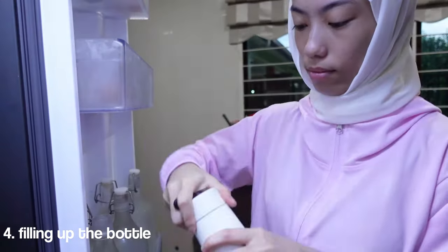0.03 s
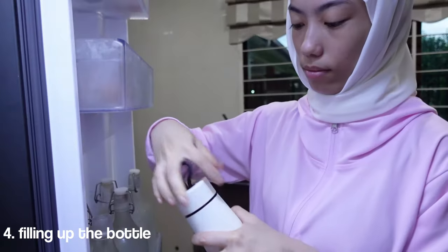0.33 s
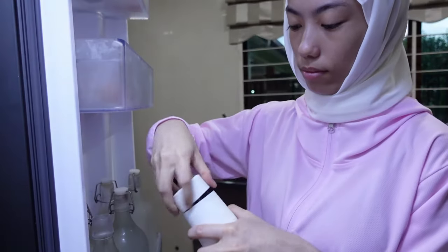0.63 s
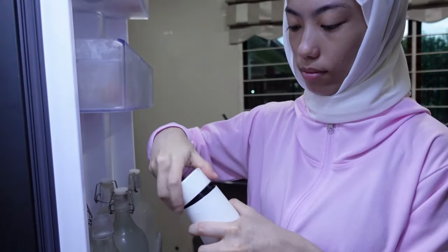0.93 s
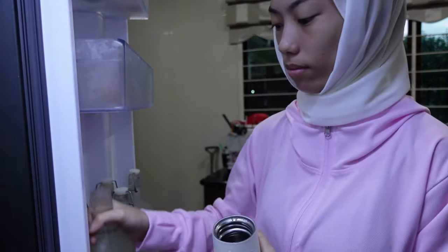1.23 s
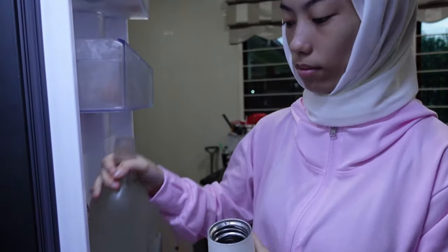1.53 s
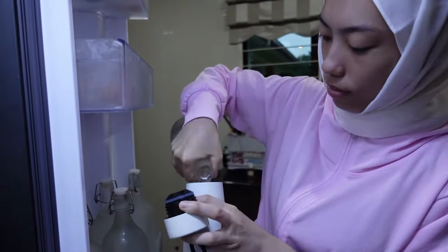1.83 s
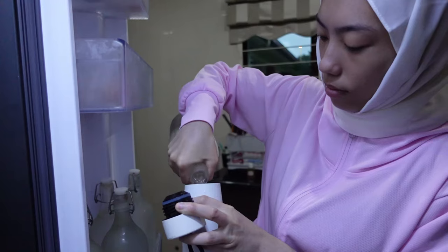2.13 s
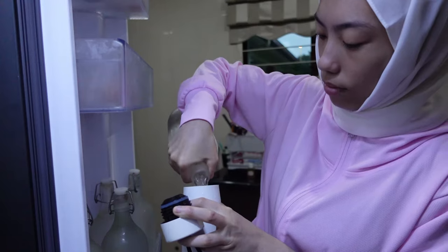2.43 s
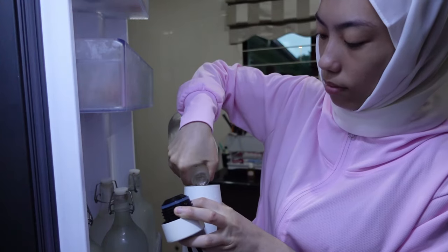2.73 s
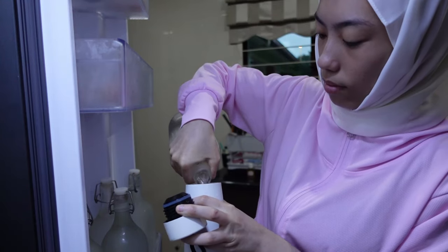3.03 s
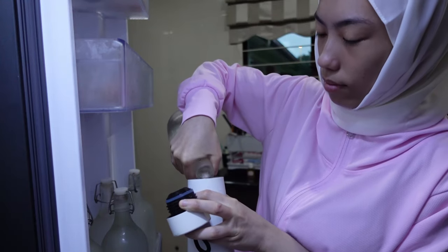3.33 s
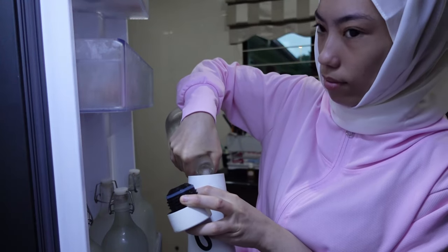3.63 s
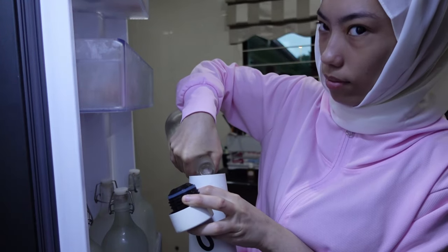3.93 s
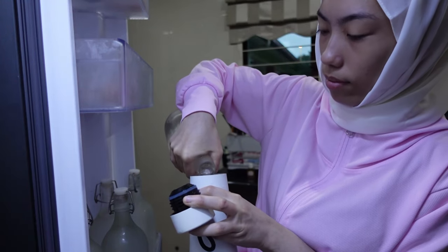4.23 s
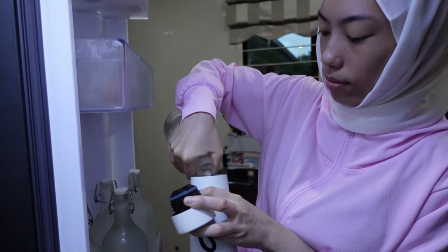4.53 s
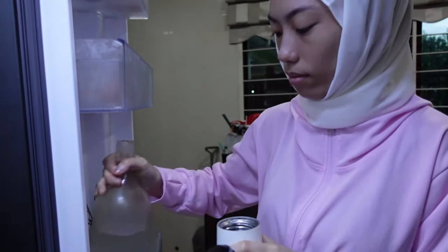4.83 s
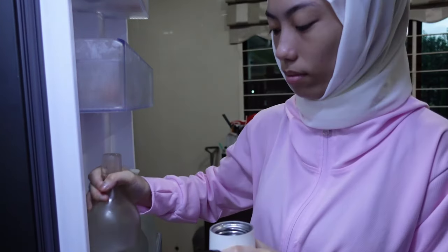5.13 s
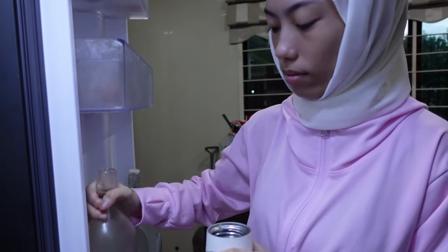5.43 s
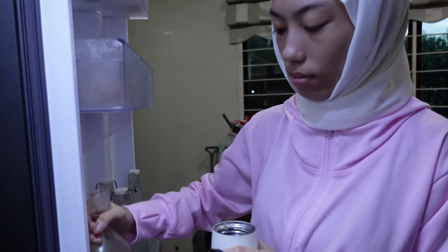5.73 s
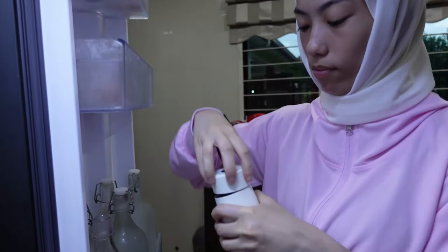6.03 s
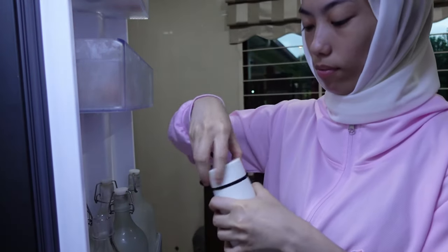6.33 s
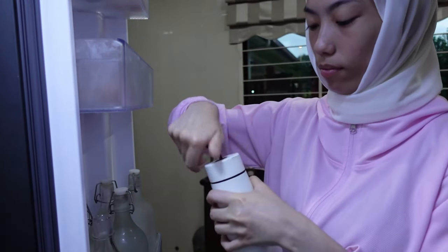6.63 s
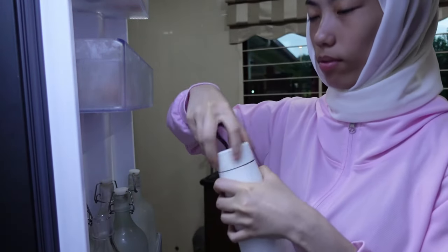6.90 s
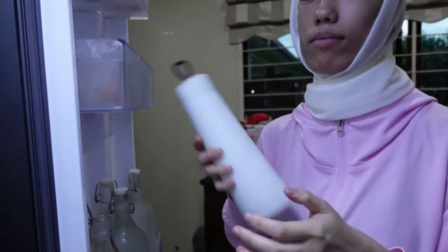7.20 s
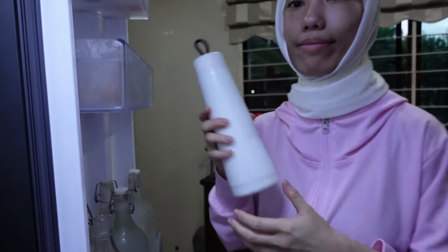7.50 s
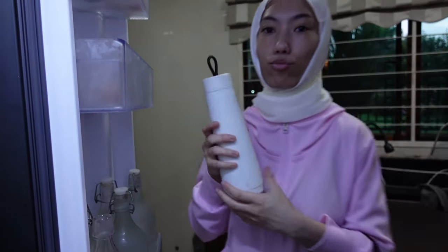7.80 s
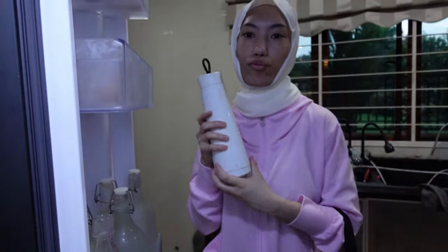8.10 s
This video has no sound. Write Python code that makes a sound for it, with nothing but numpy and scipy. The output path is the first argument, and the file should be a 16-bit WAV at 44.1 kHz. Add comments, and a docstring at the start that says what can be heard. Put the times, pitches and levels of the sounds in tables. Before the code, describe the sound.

Water pours from a glass bottle into a steel flask in a kitchen, between cap squeaks, clicks and glass knocks.

```python
"""In a kitchen, a steel flask's cap squeaks on its seal and rattles off along the threads.
Next, a glass bottle is dragged from a fridge door shelf. Water drums on the flask's bottom, then
splashes as it fills, while trapped bubbles ping and the bottle glugs as it gulps air.
The bottle clinks back among its neighbours and the cap is screwed on. Last, the full flask
sloshes faintly. Soft room noise lies under it all, and sleeves rustle now and then."""
import sys
import numpy as np
from scipy import signal
from scipy.io import wavfile
from scipy.ndimage import uniform_filter1d

SR = 44100
rng = np.random.default_rng(int(sys.argv[2]) if len(sys.argv) > 2 else 0)


def digitize_waveform(pressure):
    """Quantize a signal to 16-bit integers and store it at the path in sys.argv[1].

    Rows of a 2-D input are taken as channels; values are limited to [-1, 1].
    """
    field = np.atleast_2d(pressure).T
    bounded = np.clip(field, -1, 1)
    quanta = np.round(bounded * 32767).astype(np.int16)
    wavfile.write(sys.argv[1], SR, quanta)


N = 368631
TIME = np.arange(N) / SR

# the notes of the struck steel flask: pitch_hz, level_db, ring_s (time to fade by 60 dB)
FLASK_NOTES = [(815, -28, .15), (1031, -6, 0.55), (1080, -13, 0.72), (1530, -12, 0.73), (1760, -21.5, 0.78),
               (2060, -6.5, 0.15), (2440, -7, 0.12), (2745, -28, 0.21), (3050, -7, 0.16), (3180, 0, 0.14),
               (3820, -22, 0.36), (4800, -13, 0.12), (4970, -21, 0.16), (6120, -16, 0.28),
               (6400, -23, 0.24), (7100, -13, 0.22)]
# the tone of a thin hiss: pitch_hz, level_db
HISS_TONE = [(400, -20), (1400, 1.5), (2600, 10.5), (3600, 3), (6000, 0.5), (10000, -7.5), (16000, -41)]


def filling():
    """Water splashes, pings and glugs into the flask, under a shrinking column of air."""
    # water leaves the bottle in gushes: start_s, length_s, bubbles_db, splash_db, churn_db
    gushes = [(2.21, 0.042, -13, -32, -35), (2.435, 0.036, -9, -17, -44), (2.61, 0.02, -16, -20, -47),
              (2.645, 0.028, -4, -16.5, -54), (2.745, 0.062, -14.5, -37, -61),
              (2.82, 0.1, -14.5, -24.5, -61), (3.055, .03, -14, -18, -39), (3.085, 0.33, -12, -16.5, -26),
              (3.45, 0.042, -10.5, -16, -20.5), (3.55, 0.15, -22, -30, -33),
              (3.695, 0.027, -9.5, -30, -27.5), (3.815, 0.058, -20, -27, -43),
              (3.91, 0.049, -11.5, -34, -34.5), (4.11, 0.048, -12, -23.5, -29),
              (4.3, 0.063, -22, -28.5, -66), (4.36, 0.12, -34, -26, -43), (4.536, 0.075, -13, -46, -33),
              (4.68, 0.02, -20, -39, -40)]
    # the air bubbles that stand out: start_s, pitch_hz, level_db
    loud_bubbles = [(2.237, 1276, -5.5), (2.261, 2560, -5), (2.2696, 5270, 10.5), (2.2827, 5850, -1.5),
                    (2.3158, 4670, 0), (2.3695, 1284, 7.5), (2.389, 1300, 3), (2.4074, 1412, -2.5),
                    (2.421, 1460, -3.5), (2.4362, 1290, 2), (2.6557, 2980, -0.5), (2.6743, 1370, -17),
                    (2.6937, 1300, -6), (2.715, 5520, -3.5), (2.748, 1277, -7.5), (2.8568, 4580, -6),
                    (2.8788, 4970, -6), (2.9088, 5250, 1), (2.912, 1284, -3), (2.9276, 5600, -0.5),
                    (2.9563, 1290, -5.5), (3.0029, 6000, 1.5), (3.1123, 1370, 0.5), (3.3044, 1411, 4.5),
                    (3.5464, 5080, -1), (3.642, 5350, -4), (3.7322, 5230, -5), (3.911, 1440, -9.5),
                    (3.9834, 4990, -4.5), (4.052, 5600, -8), (4.0598, 5170, 1), (4.121, 5240, 2),
                    (4.156, 1340, -3), (4.362, 5700, 2), (4.439, 5230, 3), (4.5424, 4800, -7),
                    (4.6006, 5800, -7), (4.611, 5640, -0.5)]
    # random bubbles in a gush, large to small: pitch_hz, spread_octaves, count_per_s, level_db
    gush_bubbles = [(1380, 0.066, 37, -3), (2313, 0.357, 65, -3.5), (5034, 0.175, 60, 0)]
    # the low tone of churning water: pitch_hz, level_db
    churn_tone = [(50, -58), (150, -25), (280, -1), (370, -0.5), (490, 7.5), (720, 0), (1000, 1.5),
                  (1600, -31), (4000, -38)]
    bubble_gain, gush_gain, churn_gain = swells(gushes, rise_s=0.0047, fall_db_per_s=241)
    all_bubbles = loud_bubbles + trapped_bubbles(bubble_gain, gush_bubbles, spread_db=2.5)
    pings = bubble_pings(all_bubbles, rise=0.061, swell_cycles=1.96)
    # keeps the pings light and bright, with no low knock
    pings = signal.sosfilt(signal.butter(4, 850, "high", fs=SR, output="sos"), pings)
    splash, spray = splashing(gush_gain, slaps(all_bubbles))
    churn = amp(-0.3) * churn_gain * noise(churn_tone) * amp(3.5 * wander(35))
    # the steel walls bounce each ping about
    echoes = reverb(pings, [(1300, 0.041), (5000, 0.026)], delay_s=0.001577)
    # the air's note climbs as the water rises
    air_hz = np.interp(TIME, [2.3, 3.3, 4.7], [1290, 1370, 1580])
    air_column = amp(5) * resonate(splash, air_hz, width_hz=87)
    wall = amp(18) * resonate(splash + churn, 1026, width_hz=11)
    return amp(-2) * (pings + echoes) + splash + spray + churn + air_column + wall + glugging()


def splashing(gush_gain, slap_gain):
    """Falling water whips up a froth of tiny bubbles and throws a fine, bright spray."""
    # a thin stream runs on between gushes: start_s, length_s, splash_db, spray_db
    trickle = [(2.26, 1.965, -34, -35.5), (4.31, 0.412, -42, -29.5)]
    # the tone of the splash: pitch_hz, level_db
    splash_tone = [(200, -63), (800, -26), (1300, -2.5), (1900, -4.5), (2800, -1.5), (3700, -6.5),
                   (5100, -1.5), (7000, -21), (16000, -41)]
    # the tone of the spray: pitch_hz, level_db
    spray_tone = [(500, -59), (3500, -43), (5300, 2), (7200, -2), (9000, 1), (12000, -5), (16000, -11.5)]
    trickle_gain, mist_gain = swells(trickle, rise_s=0.0085, fall_db_per_s=240)
    froth = fizz(2200, ring_cycles=111) + 0.61 * patter(4400, spread_db=-6.5)
    splash_gain = amp(-4) * np.hypot(gush_gain, trickle_gain) * amp(2.8 * wander(45))
    splash = (splash_gain + amp(-8) * slap_gain) * unit(colour(froth, splash_tone))
    drops = fizz(800, ring_cycles=133) + 1.3 * patter(1500, spread_db=0.5)
    spray_gain = amp(-3.5) * np.hypot(amp(-9) * gush_gain, mist_gain) * amp(3 * wander(45))
    spray = (spray_gain + amp(-11.5) * slap_gain) * unit(colour(drops, spray_tone))
    return splash, spray


def glugging():
    """The bottle gulps air, and each gulp drops a slug of water that rings the flask's wall."""
    # air gulped back into the bottle: start_s, pitch_hz, level_db
    glugs = [(3.082, 480, -12), (3.177, 458, -13), (3.485, 492, -7), (3.494, 380, -7), (3.551, 376, -9.5),
             (3.701, 424, -15.5), (3.734, 382, -10), (3.919, 427, -17), (3.985, 391, -10.5),
             (4.12, 406, -10), (4.152, 440, -9.5), (4.36, 410, -12), (4.537, 406, -5), (4.613, 422, -8),
             (4.68, 432, -11)]
    out = np.zeros(N)
    for s, hz, db in glugs:
        add(out, s, amp(db - 4) * bubble(hz, ring_s=0.17, rise=0.009, swell_cycles=1.0))
        add(out, s, amp(db - 15) * ring(FLASK_NOTES[1:2]))
    return out


def bubble(hz, ring_s, rise, swell_cycles):
    """A pocket of air rings, its pitch rising as it nears the surface."""
    t = np.arange(int(ring_s * SR) + 2) / SR
    shape = (1 - np.exp(-(hz * t / swell_cycles) ** 2)) * amp(-60 * t / ring_s)
    return shape / shape.max() * np.sin(2 * np.pi * hz * t * (1 + rise * t / ring_s / 2))


def bubble_pings(rows, rise, swell_cycles):
    """Each bubble (start_s, pitch_hz, level_db) pings; small, high ones die sooner."""
    out = np.zeros(N)
    for s, hz, db in rows:
        ring_s = 0.059 * (1000 / hz) ** 0.76
        add(out, s, amp(db) * bubble(hz, ring_s, rise, swell_cycles))
    return out


def trapped_bubbles(gain, kinds, spread_db, count=1000):
    """Lists random bubbles (start_s, pitch_hz, level_db), as strong as the water that traps them."""
    rows = []
    for hz, octaves, per_s, db in kinds:
        start_s = (np.arange(count) + rng.random(count)) / per_s
        pitch, loudness = np.clip(rng.standard_normal((2, count)), -2, 2)
        water_db = 20 * np.log10(np.interp(start_s, TIME, gain, right=0) + 1e-9)
        candidates = np.c_[start_s, hz * 2 ** (octaves * pitch), water_db + db + spread_db * loudness]
        rows += list(candidates[water_db > -45])
    return rows


def slaps(rows, fade_s=0.0038):
    """A slap of water traps each bubble: a short jump in gain, harder for small bubbles."""
    out, t = np.zeros(N), np.arange(SR // 20) / SR
    for s, hz, db in rows:
        add(out, s, amp(db) * hz / (hz + 5000) * np.exp(-t / fade_s))
    return out


def fizz(per_s, ring_cycles, sizes=36):
    """A swarm of small bubbles of many sizes."""
    swarm = np.zeros(N)
    for hz in np.geomspace(1100, 14000, sizes):
        ping = bubble(hz, ring_cycles / hz, rise=0.45, swell_cycles=0.6)
        swarm += signal.oaconvolve(patter(per_s / sizes, spread_db=3), ping * hz)[:N]
    return unit(swarm)


def drumming():
    """The stream swells and beats on the bare steel bottom of the hollow flask."""
    # the first stream of water: start_s, length_s, level_db
    stream = [(1.895, .37, -15)]
    # the tone of drops on steel: pitch_hz, level_db
    drum_tone = [(60, -24), (170, -18), (260, -2.5), (370, -5), (530, -3.5), (680, -13), (860, -11),
                 (1400, -4.5), (2000, -6), (2600, -9.5), (3400, -12.5), (6000, -10), (10000, -16.5),
                 (16000, -29)]
    # the notes of the empty flask's air and walls: pitch_hz, width_hz, level_db
    hollow_notes = [(261, 19, -3), (529, 16, 7), (840, 45, 7.5), (1100, 18, -2), (1463, 45, 0.5),
                    (1740, 57, -11), (2370, 74, 0), (2690, 74, 5), (3740, 42, 5), (4600, 83, 2),
                    (5700, 110, -2)]
    drops = colour(patter(5000, spread_db=1.8), drum_tone) * amp(1.3 * wander(50))
    flow, = swells(stream, rise_s=0.084, fall_db_per_s=900)
    return amp(-1.5) * flow * unit(amp(-3) * drops + body(drops, hollow_notes))


def cap():
    """The cap scrapes and rattles on the steel threads, and the flask rings."""
    # cap, hand, bottle neck and lapping water knock on the flask: start_s, snap_db, thud_db, ring_db
    clicks = [(0.2542, -7.5, -12, -34), (0.2652, -5, -10, -38), (0.3068, -18, -18, -43),
              (0.3179, -4, -5, -19.5), (0.411, -12, -13, -27), (0.4265, -8, -6.5, -22),
              (0.4775, -23, -17.5, -44), (0.5622, -13.5, -14.5, -39), (0.626, -18, -18, -27),
              (0.6411, -19, -12.5, -33), (0.6984, 2, -12.5, -17.5), (0.7809, -3, -11, -19),
              (0.796, -7, -13.5, -46), (1.0137, -12, -18.5, -48), (1.0497, -6, -21, -43),
              (1.0542, -2, -6, -63), (4.361, -35, -14, -13), (5.9879, 7, -1, -12.5),
              (6.0129, 2.5, -5.5, -12.5), (6.2704, -6.5, -11, -30), (6.2907, -7, -12.5, -33),
              (6.3769, -7, -12, -28), (6.3939, -6.5, -7, -32), (6.4988, -5.5, -7, -46),
              (6.5138, 2, -2.5, -15), (6.5408, -10, -16, -22), (6.574, -11, -9, -30),
              (6.853, -5.5, -12, -21.5), (6.8999, -13, -12.5, -23), (6.9585, -13, -8, -15),
              (6.9676, -11.5, -11, -42), (7.4193, -13, -31, -19.5), (7.4372, -22, -16, -36),
              (7.87, -36, -20, -22), (8.0586, -19, -17, -37)]
    # the tone of a click: pitch_hz, level_db
    click_tone = [(60, -79), (200, -11.5), (460, -6.5), (680, 5), (1000, 8), (1350, 3.5), (2000, -10),
                  (2600, -2), (3100, 2), (4100, -4), (5200, -4.5), (8000, -9.5), (12000, -21), (16000, -27)]
    # the cap scrapes along the threads: start_s, length_s, level_db
    scrapes = [(.2, 0.049, -27), (.66, .04, -24.5), (.77, 0.027, -43), (6.0, 0.046, -20.5),
               (6.5, 0.054, -29)]
    # the tone of a scrape: pitch_hz, level_db
    scrape_tone = [(300, -17), (2000, -3), (6000, 0), (10000, -10), (16000, -26)]
    # the notes of the cap's shell and the flask's mouth: pitch_hz, width_hz, level_db
    shell_notes = [(445, 83, 6), (1053, 17, 5), (1340, 280, -1), (3080, 84, -1.5), (3530, 140, -10),
                   (4180, 100, -10), (4600, 86, -2), (5150, 79, 5), (6400, 190, -6.5), (10200, 300, -10)]
    rattle = blows(clicks, click_tone, FLASK_NOTES,
                   base_fade_s=0.043, split_hz=2730, thud_stretch=0.83, gain_db=-6.5)
    scrape_gain, = swells(scrapes, rise_s=0.018, fall_db_per_s=136)
    rattle += scrape_gain * colour(patter(3000, spread_db=-3), scrape_tone)
    return amp(-5) * rattle + amp(-3) * body(rattle, shell_notes)


def squeak():
    """The cap's seal sticks and slips: rough at first, then purer as the grip eases."""
    # the seal slips: start_s, length_s, level_db
    squeaks = [(.045, 0.032, -8), (.122, 0.015, -23)]
    # how fast the slips follow each other: time_s, pitch_hz
    slip_rate = [(.045, 2186), (.075, 1730), (.105, 1582), (.135, 1836), (.2, 2020)]
    pitch_hz = np.interp(TIME, *np.transpose(slip_rate))
    age_s = TIME - squeaks[0][0]
    roughness = np.clip(0.93 * np.exp(-age_s / 0.042), 0, 1)
    phase = 2 * np.pi * np.cumsum(pitch_hz * (1 + 0.12 * roughness * wander(700))) / SR
    harmonics_db = [1, 4.5, -9.5, -13, -15]
    slips = unit(sum(amp(db) * np.sin(k * phase) for k, db in enumerate(harmonics_db, 1)))
    scrape = noise([(900, -34), (1500, -10), (2300, 1.5), (3800, -10), (5000, -16.5), (16000, -27)])
    grip, = swells(squeaks, rise_s=0.0021, fall_db_per_s=620)
    return grip * (np.sqrt(1 - roughness ** 2) * slips + roughness * scrape)


def bottle_knocks():
    """The glass bottle knocks on the shelf and the flask's rim, and clinks against its neighbour."""
    # the bottle hits shelf and rim: start_s, snap_db, thud_db
    knocks = [(1.2131, -15, -8), (1.2274, -28, -18), (1.502, -18.5, -30), (1.6221, -7.5, -11.5),
              (1.6517, -15.5, -13.5), (1.6796, -17.5, -10), (4.704, -12, -27), (4.721, -4, -7),
              (4.7596, -13, -13.5), (4.772, -11.5, -24), (4.8713, -18.5, -32), (5.13, -4.5, -8),
              (5.2024, -18, -11), (5.2298, -22, -15), (5.443, -8, -10), (5.809, -7, -1.5),
              (5.8432, -39, -13)]
    # the tone of a knock: pitch_hz, level_db
    knock_tone = [(50, -46), (120, -13.5), (190, -20.5), (350, -4), (520, 3.5), (800, 3), (1080, -6),
                  (1400, -1.5), (1900, -16.5), (3000, -14.5), (4400, -15.5), (7000, -22), (15000, -39.5)]
    # the notes of glass and shelf: pitch_hz, level_db, ring_s
    glass_notes = [(1489, -9, 0.78), (1576, -3.5, 0.39), (2300, -9, 0.96), (3686, -8, 0.22), (3690, -4, .2),
                   (3990, -6, 0.21), (4160, -11, 0.17), (4430, -5, 0.12), (4424, -20, 0.21),
                   (5180, -18, .17), (5400, -19, 0.16), (5770, -13, 0.3), (6500, -25, 0.21),
                   (6670, -12, 0.21), (7900, -16, 0.15), (9200, -20, 0.2), (11200, -29, 0.18)]
    # bottle meets bottle: start_s, own_db, neighbour_db
    contacts = [(5.13, -10, -29), (5.158, -15, -10.5), (5.202, -20.5, -15), (5.232, -19.5, -15)]
    # the notes of the neighbouring bottle: pitch_hz, level_db, ring_s
    neighbour_notes = [(2202, 3.5, 0.44), (2232, -13, 0.63), (3740, -5, 0.21)]
    # the glass neck brushes the steel rim: start_s, level_db
    rim_touches = [(4.706, -11), (4.723, -30), (4.775, -40)]
    # the notes of the neck: pitch_hz, level_db, ring_s
    neck_notes = [(4440, -8.5, 0.67), (4360, -2, 0.11), (4600, -5, 0.15), (5400, -20, 0.34),
                  (6600, -19, 0.18)]
    ringing_knocks = [(s, snap_db, thud_db, thud_db - 34) for s, snap_db, thud_db in knocks]
    out = blows(ringing_knocks, knock_tone, glass_notes,
                base_fade_s=0.052, split_hz=1560, thud_stretch=1.9, gain_db=-4.5)
    clinks = np.zeros(N)
    for s, own_db, neighbour_db in contacts:
        clinks *= amp(-9 * (TIME > s))  # each new contact damps what is still ringing
        add(clinks, s, amp(own_db) * ring(glass_notes) + amp(neighbour_db) * ring(neighbour_notes))
    for s, db in rim_touches:
        add(out, s, amp(db) * ring(neck_notes))
    return out + clinks


def shelf_boom():
    """The door shelf booms when the bottle's base lands on it."""
    # the landings: start_s, length_s, level_db
    thumps = [(1.228, 0.13, -38.5), (1.679, .01, -40), (5.811, 0.033, -25)]
    # the low notes of the shelf: pitch_hz, width_hz, level_db
    shelf_notes = [(104, 14, -2), (125, 12, -0.5), (258, 41, -7.5), (347, 24, -6)]
    gain, = swells(thumps, rise_s=0.0071, fall_db_per_s=132)
    rumble = noise([(50, -25), (110, 3), (400, 3), (1200, -29)])
    return gain * unit(body(rumble, shelf_notes))


def bottle_slides():
    """Glass drags over the plastic shelf: the glass rasps and the shelf groans."""
    # one list for each slide: time_s, groan_db, rasp_db
    slides = [
        [(1.08, -38.5, -32), (1.2, -26, -15.5), (1.238, -37, -19), (1.366, -35.5, -25), (1.48, -64, -40)],
        [(5.38, -45, -24), (5.496, -28.5, -34), (5.584, -40.5, -23), (5.842, -27.5, -28), (5.908, -71, -27.5),
         (5.98, -20.5, -20)],
    ]
    # the notes of rubbed glass: pitch_hz, width_hz, level_db
    rubbed_notes = [(1577, 25, 2), (2240, 19, 3), (3670, 53, -9), (3820, 37, 2.5), (3980, 33, 8),
                    (6137, 29, 3.5), (6700, 60, -8), (7920, 50, -7), (8700, 44, -10), (10350, 60, -10),
                    (11500, 70, -14)]
    # the tone of the groaning shelf: pitch_hz, level_db
    groan_tone = [(50, -34), (120, -6.5), (180, -21), (320, -10.5), (500, 9.5), (750, -4), (1100, -17),
                  (2000, -59), (5000, -28.5)]
    grit = patter(4000, spread_db=-2)
    rasp = unit(body(grit, rubbed_notes) + amp(-40) * colour(grit, HISS_TONE))
    groan = noise(groan_tone)
    out = np.zeros(N)
    for slide in slides:
        groan_gain, rasp_gain = levels(slide)
        out += amp(6) * groan_gain * groan + amp(-8) * rasp_gain * rasp
    return out


def sloshing():
    """Water laps in the closed flask, traps a few bubbles and makes the wall hum."""
    # the laps of water: start_s, length_s, level_db
    laps = [(7.1, 0.042, -23), (7.225, 0.053, -22), (7.41, 0.031, -28), (7.52, 0.25, -32.5),
            (7.86, 0.055, -27), (8.0, 0.071, -32.5)]
    # the tone of a lap: pitch_hz, level_db
    slosh_tone = [(200, -18), (800, 1.5), (1900, -7), (3200, 3.5), (4800, -6), (7000, -2), (10000, -9),
                  (16000, -13)]
    # random bubbles in a lap: pitch_hz, spread_octaves, count_per_s, level_db
    lap_bubbles = [(5700, 0.39, 45, 5)]
    lap_gain, = swells(laps, rise_s=0.0055, fall_db_per_s=103)
    froth = fizz(900, ring_cycles=79) + 1.4 * patter(2000, spread_db=4.5)
    slosh = amp(-5) * lap_gain * unit(colour(froth, slosh_tone))
    trapped = trapped_bubbles(lap_gain, lap_bubbles, spread_db=1.5)
    pings = bubble_pings(trapped, rise=0.062, swell_cycles=2.2)
    echoes = amp(-2) * reverb(pings, [(1300, 0.052), (5000, 0.017)], delay_s=0.0015)
    wall = amp(21) * resonate(slosh, 1026, width_hz=9.8)
    return slosh + amp(-3) * pings + echoes + wall


def background():
    """Steady low room noise, a thin hiss, and the soft rustle of sleeves."""
    # sleeves brush as the arm moves: start_s, length_s, level_db
    rustles = [(.1, 0.081, -33), (4.78, 0.71, -34), (5.33, 0.32, -28.5), (6.0, 0.083, -33.5),
               (7.05, 0.62, -33), (7.8, 0.39, -34)]
    # the tone of the room noise: pitch_hz, level_db
    room_tone = [(20, -52), (60, -25.5), (130, -13), (300, -9.5), (400, 1), (520, -4.5), (900, -0.5),
                 (1500, -7.5), (2500, -21.5), (8000, -22.5)]
    rustle_gain, = swells(rustles, rise_s=0.11, fall_db_per_s=47)
    return amp(-38) * noise(room_tone) + np.hypot(amp(-38.5), rustle_gain) * noise(HISS_TONE)


def blows(rows, tone, notes, base_fade_s, split_hz, thud_stretch, gain_db):
    """Each blow is a bright snap and a low thud, one soft rebound, and the object's ring."""
    out, t = np.zeros(N), np.arange(SR // 4) / SR
    high, low = (signal.butter(4, split_hz, kind, fs=SR, output="sos") for kind in ("high", "low"))
    for s, snap_db, thud_db, ring_db in rows:
        rebound_s = 0.012 * rng.uniform(.5, 2)
        snap_s = base_fade_s * amp(-0.28 * snap_db)  # harder blows are shorter
        for band, db, fade_s in ((high, snap_db, snap_s), (low, thud_db, snap_s * thud_stretch)):
            for delay_s, drop_db in ((0, 0), (rebound_s, -22)):
                burst = rng.standard_normal(len(t)) * amp(-60 * t / max(fade_s, .01))
                burst = signal.sosfilt(band, colour(burst, tone))
                burst /= burst[:SR // 125].std()  # the first 8 ms set the level
                add(out, s + delay_s, amp(db + gain_db + drop_db) * burst)
        add(out, s, amp(ring_db) * ring(notes))
    return out


def ring(notes):
    """A struck object's notes fade away; where it is hit changes how loud each one is."""
    t = np.arange(SR // 2) / SR
    return sum(amp(db + 2.5 * rng.standard_normal() - 60 * t / ring_s) * np.sin(2 * np.pi * hz * t)
               for hz, db, ring_s in notes)


def body(x, notes):
    """An object shaken by x answers at its own notes."""
    return sum(amp(db) * resonate(x, hz, width_hz) for hz, width_hz, db in notes)


def resonate(x, hz, width_hz):
    """Lets through a narrow band around a steady or moving pitch."""
    r = np.exp(-np.pi * width_hz / SR)
    if np.isscalar(hz):
        return signal.lfilter([1 - r, 0, r - 1], [1, -2 * r * np.cos(2 * np.pi * hz / SR), r * r], x)
    turn = np.exp(2j * np.pi * np.cumsum(hz) / SR)
    return 2 * (turn * signal.lfilter([1 - r], [1, -r], x / turn + 1e-18)).real


def reverb(x, ring_times, delay_s):
    """Scattered random echoes; rows of (pitch_hz, ring_s) say how long each pitch lasts."""
    echoes = rng.standard_normal(SR // 2) * (rng.random(SR // 2) < .1)
    hz, t, bands = signal.stft(echoes, SR, nperseg=128)
    fade = amp(-60 * t / at_pitch(ring_times, hz)[:, None])
    tail = signal.istft(bands * fade, SR, nperseg=128)[1]
    return signal.oaconvolve(x, np.r_[np.zeros(int(delay_s * SR)), tail / np.linalg.norm(tail)])[:N]


def patter(per_s, spread_db):
    """Random tiny taps of uneven strength."""
    chance = rng.random(N) * SR / per_s
    hits, out = np.flatnonzero(chance < 1), np.zeros(N)
    out[hits] = (-1) ** hits * amp(spread_db * np.minimum(-np.log(chance[hits]), 4))
    return unit(out)


def noise(tone):
    """Steady noise with the given tone."""
    return colour(rng.standard_normal(N), tone)


def colour(x, tone, size=4096):
    """Shapes x to a tone of (pitch_hz, level_db), with a filter that never rings ahead of the sound."""
    log_gain = np.log(amp(at_pitch(tone, abs(np.fft.fftfreq(size, 1 / SR)))))
    taps = np.fft.ifft(np.exp(np.conj(signal.hilbert(log_gain)))).real[:size // 2]
    return signal.oaconvolve(x, taps / np.linalg.norm(taps))[:len(x)]


def wander(per_s):
    """Glides to a new random value per_s times a second."""
    turns_s = np.arange(0, N / SR + 1, 1 / per_s)
    return np.interp(TIME, turns_s, rng.standard_normal(N)[:len(turns_s)])


def swells(rows, rise_s, fall_db_per_s):
    """Each row rises, holds and dies away; gives one gain curve for each dB column."""
    gains = 0
    for s, length_s, *dbs in rows:
        rise = np.clip((TIME - s) / rise_s, 0, 1)
        fall = amp(-fall_db_per_s * np.maximum(TIME - s - length_s, 0))
        gains = np.maximum(gains, amp(dbs)[:, None] * rise * fall)
    return gains


def levels(rows):
    """One gliding gain curve for each dB column, silent outside the table."""
    times_s, *columns = np.transpose(rows)
    return [amp(np.interp(TIME, times_s, db, left=-120, right=-120)) for db in columns]


def at_pitch(rows, hz):
    """Looks up a value between a table's pitches, spaced by octaves."""
    pitches_hz, values = np.transpose(rows)
    return np.interp(np.log(hz + 1), np.log(pitches_hz + 1), values)


def add(mix, start_s, sound):
    """Mixes a sound in at its start time."""
    part = mix[max(round(start_s * SR), 0):][:len(sound)]
    part += sound[:len(part)]


def amp(db):
    """Turns decibels into a gain to multiply by."""
    return 10 ** (np.asarray(db) / 20)


def unit(x):
    """Scales a sound to an average (rms) level of 1."""
    return x / np.sqrt(np.mean(x ** 2) + 1e-20)


def scene():
    """All sources stand in the kitchen, just in front of two closely spaced microphones."""
    # how long the kitchen echoes: pitch_hz, ring_s
    kitchen = [(150, 0.5), (1000, 0.4), (5000, 0.32), (15000, 0.12)]
    near = squeak() + cap() + bottle_knocks() + shelf_boom() + bottle_slides()
    near += drumming() + filling() + sloshing()
    mid = near + amp(-13) * reverb(near, kitchen, delay_s=.005) + background()
    side = amp(-11) * reverb(near, [(300, 0.018), (8000, 0.058)], delay_s=0.0019)
    side += amp(-8.5) * background()
    # low sounds reach the two microphones more alike
    side -= 0.17 * signal.sosfilt(signal.butter(1, 800, fs=SR, output="sos"), side)
    return np.array([mid + side, mid - side]) * amp([[-.55], [.55]])


def record(dry, threshold_db=-9, recover_db_per_s=70, top_hz=15850):
    """Cuts deep bass, turns down briefly after the loudest blows, clips peaks, cuts the top treble."""
    dry = signal.sosfilt(signal.butter(2, 60, "high", fs=SR, output="sos"), dry)
    power_db = 10 * np.log10(abs(uniform_filter1d((dry ** 2).mean(0), size=200)) + 1e-12)
    recovery_db = TIME * recover_db_per_s
    held_db = np.maximum.accumulate(power_db + recovery_db) - recovery_db
    over_db = np.maximum(held_db - threshold_db, 0)
    limited = np.clip(dry / amp(.5 * uniform_filter1d(over_db, size=100)), -1, 1)
    treble_cut = signal.firwin(511, top_hz, window=("kaiser", 8), fs=SR)
    return signal.oaconvolve(limited, treble_cut[None], "same")


dry = scene()
out = record(dry)
digitize_waveform(out)
```